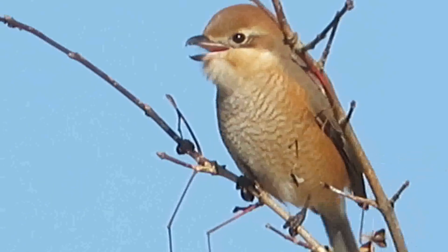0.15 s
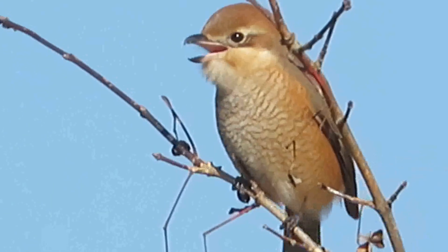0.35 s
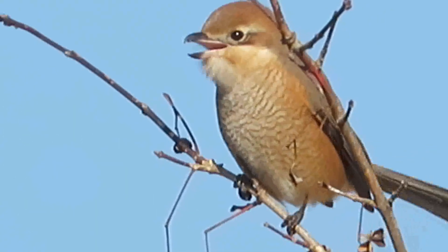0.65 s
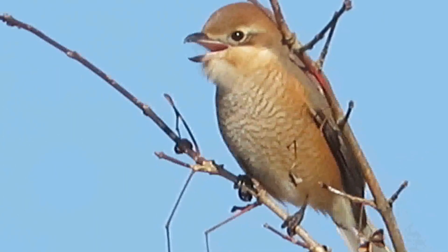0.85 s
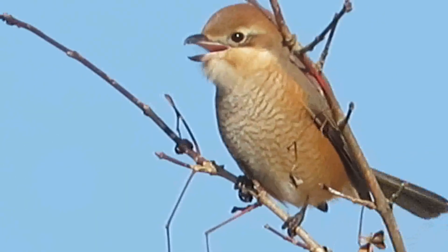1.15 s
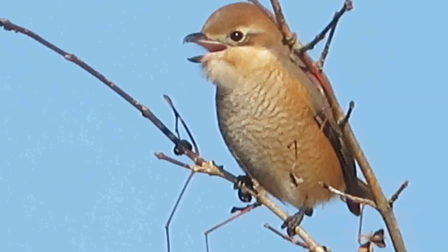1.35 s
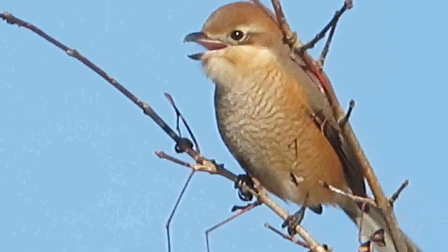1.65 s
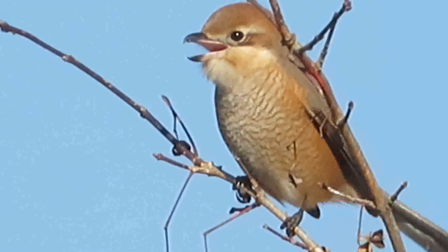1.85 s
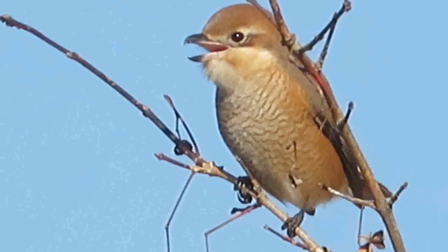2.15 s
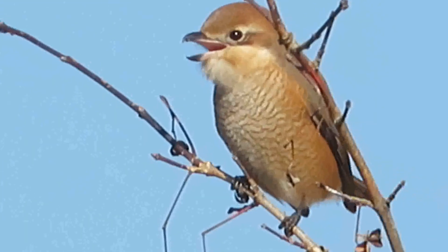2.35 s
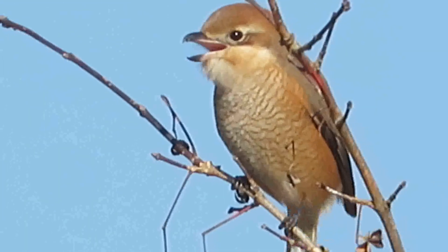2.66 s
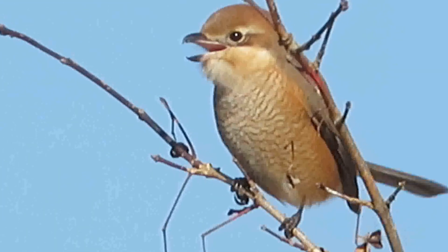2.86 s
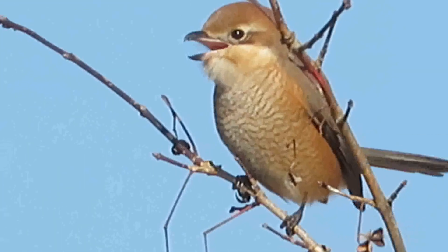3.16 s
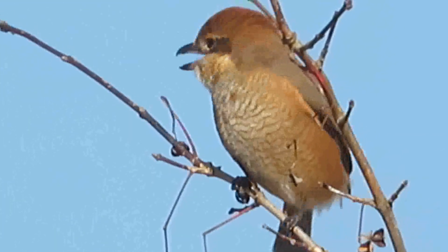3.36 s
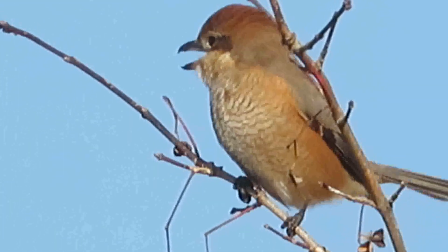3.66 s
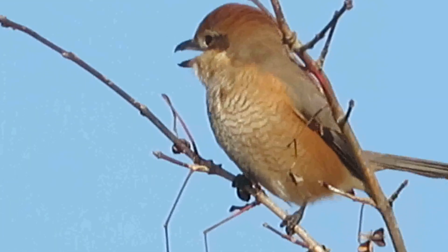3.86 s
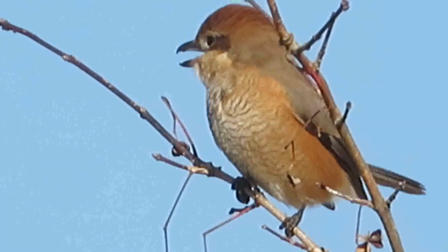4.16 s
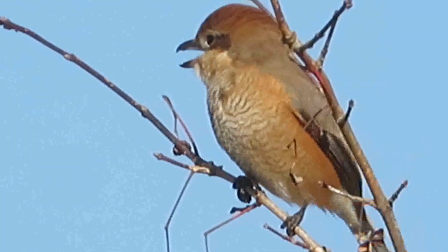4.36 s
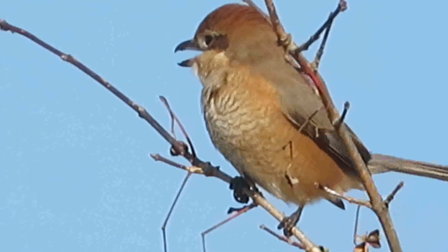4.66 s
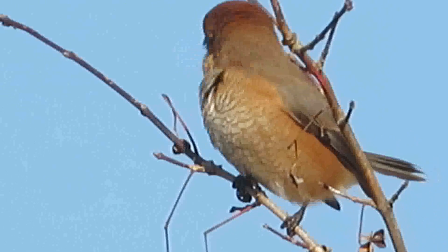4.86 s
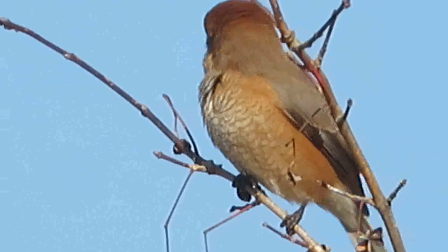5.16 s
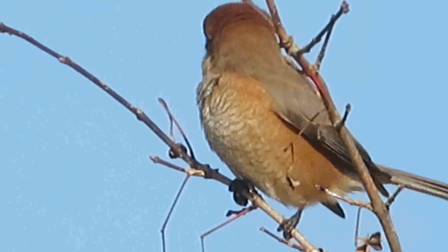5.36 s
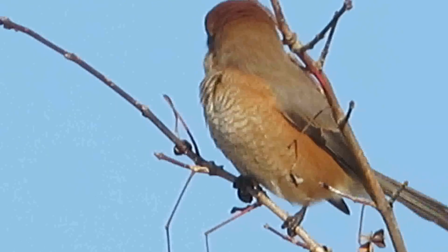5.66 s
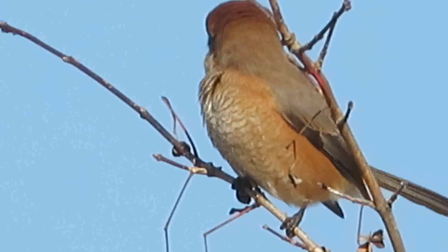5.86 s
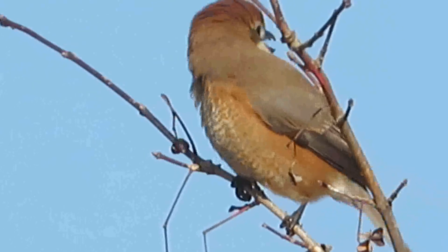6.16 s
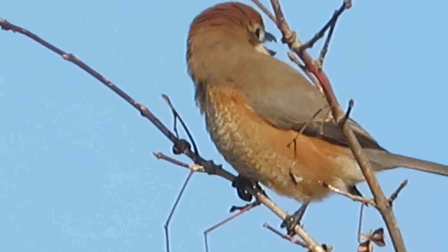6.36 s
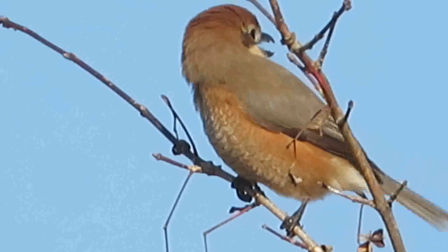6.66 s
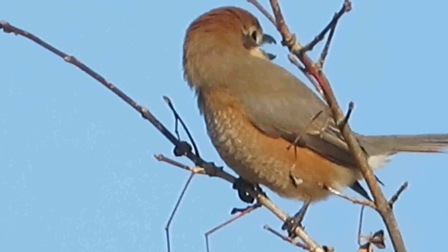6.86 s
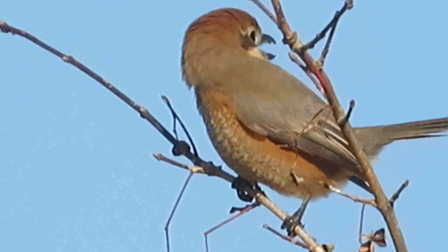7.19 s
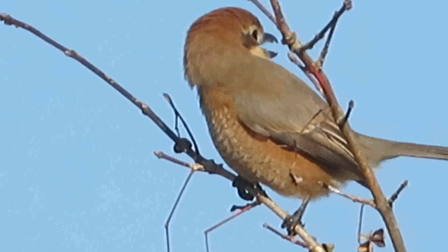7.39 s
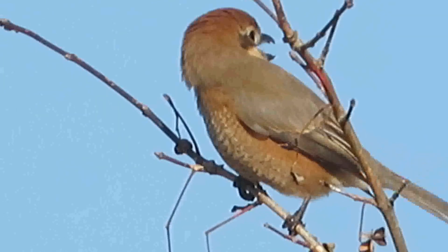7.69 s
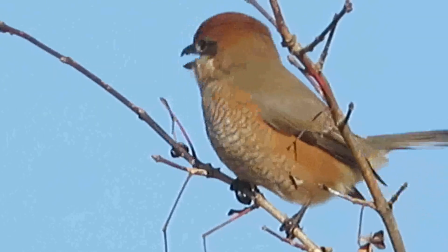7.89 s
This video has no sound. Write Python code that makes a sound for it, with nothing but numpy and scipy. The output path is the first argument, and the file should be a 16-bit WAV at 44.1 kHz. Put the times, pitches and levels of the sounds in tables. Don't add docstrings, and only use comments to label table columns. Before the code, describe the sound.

A shrike on a bare twig rattles harsh, fast chattering notes without pause, dulling as its head turns, over low wind buffeting and faint town hum.

```python
import sys
import numpy as np
from scipy import signal
from scipy.fft import rfft, irfft, next_fast_len
from scipy.io import wavfile
from scipy.ndimage import uniform_filter1d

SR = 44100
rng = np.random.default_rng(int(sys.argv[2]) if len(sys.argv) > 2 else 0)


def to_linear_factor(level_db):
    exponent = np.asarray(level_db, float) / 20
    return 10 ** exponent


def persist_wave(psi):
    counts = np.round(np.clip(psi, -1, 1) * 32767).astype(np.int16)
    wavfile.write(sys.argv[1], SR, np.atleast_2d(counts).T)


N = 354123

# (frequency [Hz], level [dB per Hz])
HUM_MIDDLE = [(25, -29.5), (80, -12), (200, -13), (270, -13.5), (450, -12.5), (560, -17.5), (900, -20),
              (1150, -26), (1800, -30), (3500, -33), (6200, -38.5), (9000, -44), (12000, -48.5),
              (15500, -56)]
# (frequency [Hz], level [dB per Hz])
HUM_SIDE = [(25, -35), (80, -51), (160, -23.5), (450, -17), (560, -24), (900, -25.5), (2000, -32),
            (4000, -40), (9000, -48.5), (12000, -54), (15500, -61)]
# (time [s], level [dB])
GUSTS = [(0, -53.5), (.83, -51.5), (1.54, -49), (1.74, -52), (2.1, -47.5), (2.28, -55.5), (2.75, -52),
         (3.06, -54), (3.58, -52.5), (4.72, -53.5), (4.83, -52.5), (5.81, -53), (6.06, -48), (6.33, -59),
         (6.46, -49.5), (6.82, -51), (7.05, -48), (7.38, -51.5)]
# (frequency [Hz], level [dB])
RUMBLE_COLOUR = [(15, -23), (30, -4.5), (55, 1.5), (85, 1.5), (120, -11), (250, -34), (1000, -130)]
# (frequency [Hz], level [dB])
FLUTTER_COLOUR = [(50, -25), (100, -8.5), (125, 3.5), (200, -6.0), (320, -17.0), (600, -48), (2000, -130)]
# (time [s], peak level [dB], frequency [Hz])
THUMPS = [(.155, -30, 144), (0.381, -33.5, 124), (1.191, -32, 108), (1.405, -32.5, 82), (1.599, -28, 128),
          (1.637, -30, 107), (1.756, -32.5, 71.6), (1.916, -34, 115), (1.933, -30, 80), (1.952, -28, 113),
          (1.984, -34.5, 114), (2.166, -37, 109), (2.2, -32.5, 86.5), (5.257, -36, 95.5), (5.303, -32, 86),
          (5.387, -31, 80.5), (5.728, -33, 119), (5.757, -36, 80.5), (6.348, -39, 87), (6.369, -32, 84),
          (6.392, -34.5, 95.5), (6.411, -29, 90), (6.433, -34, 107), (6.492, -32, 85.5), (6.614, -37, 100),
          (6.899, -33.5, 114), (6.936, -31.5, 122), (6.979, -31.5, 127), (7.096, -34, 90), (7.118, -32, 95)]
# (frequency [Hz], level [dB])
FEATHER_COLOUR = [(1200, -30), (2200, 0), (4200, 0), (6000, -27)]
# (time [s], frequency [Hz], rms level [dB])
WHISTLES = [
    [(2.52, 5900, -78), (2.535, 6100, -76), (2.555, 6160, -72), (2.57, 6900, -74)],
    [(3.515, 6300, -78), (3.525, 6480, -70), (3.54, 6500, -68), (3.55, 6750, -74)],
    [(5.655, 6800, -82), (5.67, 6400, -71), (5.688, 6100, -70), (5.70, 6400, -70), (5.713, 6850, -77),
     (5.722, 6600, -72), (5.73, 5900, -80)],
    [(7.247, 6840, -78), (7.258, 6350, -59), (7.27, 6330, -63), (7.288, 6200, -60), (7.30, 6730, -64),
     (7.31, 6000, -61), (7.317, 4900, -74)],
    [(7.373, 6150, -74), (7.386, 5750, -68), (7.40, 6200, -59.5), (7.412, 6500, -59), (7.428, 6900, -70),
     (7.435, 6800, -68), (7.443, 5200, -68)],
]
# (frequency [Hz], level [dB])
ECHO_COLOUR = [(1000, 8.0), (5000, 4.0), (9000, 8.5), (15000, -10)]

# (time [s], level [dB])
FACING_NOTES = [(0.023, -46), (.1012, -47.5), (.1768, -46), (0.2595, -46.5), (0.3432, -46), (0.4245, -45.5),
                (0.5122, -46.5), (0.593, -47), (0.6758, -47.5), (0.7518, -49), (0.8357, -51), (0.919, -47.5),
                (1.0051, -46.5), (1.0884, -47.5), (1.166, -46.5), (1.2454, -47.5), (1.3268, -46.5), (1.41, -47),
                (1.493, -46), (1.5796, -45.5), (1.6617, -45.5), (1.7403, -46.5),
                (1.822, -48.5), (1.9034, -47), (1.9868, -48), (2.0719, -47.5), (2.1544, -47), (2.24, -48),
          (2.321, -47), (2.405, -46), (2.492, -45.5), (2.5713, -46.5), (2.653, -46.5), (2.7328, -46.5),
          (2.8176, -45.5), (2.9015, -45.5), (2.9814, -47), (3.0611, -49), (3.1457, -47.5), (3.2228, -48),
          (3.3087, -47.5), (3.3949, -48.5), (3.4758, -46.5)]
SIDEWAYS = [(3.552, -52), (3.6318, -55.5), (3.7152, -56.5), (3.7967, -57), (3.8758, -55.5), (3.9622, -54),
            (4.0505, -53.5), (4.1487, -55), (4.2536, -54.5), (4.3327, -54.5), (4.421, -53.5), (4.5054, -56),
            (4.5961, -53), (4.683, -55.5), (4.774, -55.5), (4.863, -54), (4.949, -53), (5.0382, -54.5),
            (5.1147, -55.5), (5.2003, -54), (5.2906, -51)]
AWAY = [
    (5.4647, -52),
    (5.5556, -49.5),
    (5.6409, -50),
    (5.725, -49.5),
    (5.812, -50.5),
    (5.892, -51.5),
    (5.976, -50.5),
    (6.0613, -53),
    (6.1473, -50.5),
    (6.235, -51),
]
OVER_SHOULDER = [(6.309, -54.5), (6.3964, -53), (6.483, -53), (6.5727, -53.5), (6.6608, -53.5),
                 (6.7418, -52.5), (6.8218, -52), (6.9057, -53), (6.988, -52.5), (7.0743, -54), (7.156, -56),
                 (7.242, -54.5), (7.3243, -53.5), (7.4065, -54), (7.487, -56), (7.5742, -55), (7.6569, -57),
                 (7.7402, -56.5), (7.831, -55), (7.912, -55.5), (7.9903, -54)]
# (time [s], level of a usual note [dB], pulse rate [Hz], level of the top [dB])
HEAD = [(0, -48, 1450, -19), (1.0, -47.5, 1447, -19), (1.75, -47, 1435, -16.5), (2.3, -47.5, 1440, -18.5),
        (3.49, -47, 1434, -18.5), (3.56, -54, 1430, -14), (4.1, -55.5, 1433, -21), (5.1, -55, 1425, -19),
        (5.3, -53.5, 1417, -28), (5.45, -54.5, 1437, -48), (5.75, -51.5, 1441, -31),
        (6.2, -52.5, 1405, -29), (6.6, -54, 1434, -30), (7.0, -53, 1456, -29), (7.4, -55.5, 1483, -21),
        (8.03, -54, 1463, -27)]
# (start [ms], length [ms], level [dB], rate factor at start [ratio], rate factor at end [ratio])
BURSTS = [
    (.3, 5, 3, 1.04, 0.98),
    (9.6, 4.8, 3, 1.03, 0.96),
    (16, 8.3, -8, 1.0, .95),
]
# (start [ms], length [ms], level [dB])
SLIPS = [
    (.6, 0.39, -15.5),
    (5.2, 3.54, -3.5),
    (14.5, 3.1, -4),
    (18.63, 2.65, -5.5),
    (24, .8, -9.5),
]
# (time [ms], rate factor [ratio], level [dB])
CLOSING = [
    (17.1, .93, -35),
    (18.9, .91, -8.5),
    (22, .895, -7),
    (23.85, .88, -10.5),
    (25.8, 0.88, -13),
    (29, 0.84, -36),
]
# (frequency [Hz], level [dB])
THROAT = [(1440, -12), (2100, -10.5), (2850, -8), (3600, -22), (4150, -1.5), (4550, 0), (5050, 1),
          (5730, -6.5), (7100, -24.5), (8400, -28.5), (10000, -32.5), (11400, -27.5), (13000, -37.5),
          (15500, -46)]
# (frequency [Hz], level [dB])
BREATH_COLOUR = [(1200, -62), (2700, -1.5), (4000, 4.5), (5500, -19.0), (6500, -47), (8500, -38),
                 (10500, -19.5), (13000, -36), (16000, -60)]
AIM_HZ = [1500, 3580, 4400, 4660, 6260, 7340]
CLOSING_BEAK_DB = np.array([2.5, -14, -7.5, 7, -5, -2])

# (frequency [Hz], level [dB])
STARVED_COLOUR = [(1900, -40), (2700, 0), (3700, 0), (4200, -14), (5400, -14), (6000, 0)]
# (frequency [Hz], level [dB])
RING_COLOUR = [(3000, -40), (4000, -1.5), (6000, -21), (7000, -40)]


def colour(x, points):
    size = next_fast_len(x.shape[-1])
    hz, db = np.transpose(points)
    grid = np.maximum(np.arange(size // 2 + 1) * SR / size, 1)
    gain = to_linear_factor(np.interp(np.log(grid), np.log(hz), db))
    return irfft(rfft(x, size) * gain, size)[..., :x.shape[-1]]


def unit(x):
    return x / np.sqrt(np.mean(x ** 2))


def walk(rate, shape=(N,)):
    k = max(int(SR / rate), 1)
    once = uniform_filter1d(rng.standard_normal(shape), k)
    return unit(uniform_filter1d(once, k))


def town():
    noise = rng.standard_normal((2, N))
    mid = colour(noise[0], HUM_MIDDLE)
    side = colour(noise[1], HUM_SIDE)
    scale = to_linear_factor(-53.5 + 0.38 * walk(0.64)) / np.sqrt(np.mean(mid ** 2))
    return scale * np.array([0.84 * (mid + side), 0.9 * (mid - side)])


def wind():
    rumble_db = np.interp(np.arange(N) / SR, *np.transpose(GUSTS))
    flutter_db = -57.5 + 1.46 * (rumble_db + 53)
    throb = 1.24 * walk(19.0)
    noise = rng.standard_normal((4, N))
    sides = np.array([[1], [-1]])
    rumble = unit(colour(noise[0], RUMBLE_COLOUR))
    rumble = rumble + 0.042 * sides * unit(colour(noise[1], FLUTTER_COLOUR))
    flutter = unit(colour(noise[2], FLUTTER_COLOUR))
    flutter = flutter + .5 * sides * unit(colour(noise[3], FLUTTER_COLOUR))
    return to_linear_factor(rumble_db + throb + 1.5) * rumble + to_linear_factor(flutter_db + throb - 1.0) * flutter


def eddies():
    s, db, _ = np.transpose(THUMPS)
    chance = rng.standard_normal((len(s), 3)).T
    shed_s = np.clip(s + 0.05 * chance[0], .05, 7.9)
    shed_db = db - 4 + 2 * chance[1]
    shed_hz = 98 * (1 + 0.22 * chance[2])
    return np.vstack([THUMPS, np.transpose([shed_s, shed_db, shed_hz])])


def thumps():
    out, rows = np.zeros((2, N)), eddies()
    turn = 2 * np.pi * rng.random((len(rows), 1))
    half = 1500
    t = np.arange(-half, half) / SR
    port_db = np.array([[-1.9], [1.7]])
    for (s, db, hz), phase in zip(rows, turn):
        bump = np.exp(-(t * hz / 0.59) ** 2)
        i = int(s * SR) + np.arange(-half, half)
        skew = np.array([[1], [-1]]) * 0.49 * hz / 110
        push = bump * np.cos(2 * np.pi * hz * t + phase + skew)
        edge = np.cos(2 * np.pi * 2.17 * hz * t + 2 * skew + 2 * phase)
        snap = 0.31 * to_linear_factor(db + 32.0) * bump ** 2 * edge
        out[:, i] += to_linear_factor(db + 0.2 + port_db) * (push + snap)
    return out


def rustle():
    t = np.arange(N) / SR
    shake = np.exp(-((t - 4.925) / 0.017) ** 2) * to_linear_factor(2.4 * walk(300))
    return to_linear_factor(-62.0) * shake * unit(colour(rng.standard_normal(N), FEATHER_COLOUR))


def whistler():
    out = np.zeros(N)
    for call in WHISTLES:
        s, hz, db = np.transpose(call)
        i = np.arange(int(s[0] * SR), int(s[-1] * SR))
        fade = np.minimum(1, np.minimum(i - i[0], i[-1] - i) / 90)
        level = to_linear_factor(np.interp(i / SR, s, db))
        phase = 2 * np.pi * np.cumsum(np.interp(i / SR, s, hz)) / SR
        out[i] = np.sqrt(2) * fade * level * np.sin(phase)
    return out * to_linear_factor(1.5 * walk(120))


def hedges(x):
    t = np.arange(int(.7 * SR)) / SR
    near, far = (-16.0, .045), (-19, 0.86)
    tail = 0
    for db, t60 in (near, far):
        decay = np.exp(-np.log(1000) * t / t60) * np.minimum(t / 0.0021, 1)
        scatter = rng.standard_normal((3, len(t)))
        tail = tail + to_linear_factor(db) * decay / np.sqrt(np.sum(decay ** 2)) * scatter
    ports = .62 * tail[0] + .78 * tail[1:]
    return signal.fftconvolve(x[None], colour(ports, ECHO_COLOUR), axes=1)[:, :N]


def swells(ms, rows, rise, fall, arch):
    start, length, db = np.transpose(rows)[:3, :, None]
    inside = np.clip(2 * (ms - start) / length - 1, -1, 1)
    before = np.maximum(start - ms, 0)
    after = np.maximum(ms - start - length, 0)
    return np.max(db - arch * inside ** 2 - rise * before - fall * after, axis=0)


def membrane(hz, orders, tint_db, bright_db):
    phase = 2 * np.pi * np.cumsum(hz) / SR
    f = np.outer(orders, hz)
    throat_hz, throat_db = np.transpose(THROAT)
    tint = np.interp(f, AIM_HZ, tint_db) + bright_db * np.clip(f / 3000 - 2, 0, 1)
    gain = to_linear_factor(np.interp(np.log(f), np.log(throat_hz), throat_db) + tint)
    lag = 2 * np.pi * rng.random((len(orders), 1))
    return np.sqrt(2) * np.sum(gain * np.sin(np.outer(orders, phase) + lag), axis=0)


def shrike():
    span = int(.032 * SR)
    out = np.zeros((2, N + span))
    onset, level = np.transpose(FACING_NOTES + SIDEWAYS + AWAY + OVER_SHOULDER)
    head_s = np.array(HEAD)[:, 0]
    usual, pulse, top = (np.interp(onset, head_s, c) for c in np.transpose(HEAD)[1:])
    push, count = level - usual, len(onset)
    chance = rng.standard_normal((count, 3)).T
    pulse = pulse + 6 * push + 10.7 * chance[0]
    top = top - 0.2 * push
    closing = -7 - 2 * push + 2.2 * chance[1]
    tempo = 1 + 0.024 * chance[2]
    wobble = 1 + .012 * walk(600, shape=(count, 2, span))
    swell = to_linear_factor(0.83 * walk(350, shape=(count, 3, span)))
    rasp = 1 + to_linear_factor(-15) * walk(5000, shape=(count, span))
    air = unit(colour(rng.standard_normal((count, span)), BREATH_COLOUR))
    knots = [knot for s, n, _, a, b in BURSTS for knot in ((s, a), (s + n, b))]
    ms, rate = np.transpose(knots)
    end_ms, end_rate, end_db = np.transpose(CLOSING)
    whole = np.arange(1, 11)
    for k, (s, db, hz, top_db, closing_db) in enumerate(zip(onset, level, pulse, top, closing)):
        t = 1000 * np.arange(span) / SR / tempo[k]
        round_head = -.45 * (db + 51.5)
        tint = [1.04 * round_head + 1.0, round_head, 0, 0, 0.85 * (top_db + 18.0), top_db + 20.0]
        bright = 3.5 - ((t - 13.5) / 5.5) ** 2
        main = hz * np.interp(t, ms, rate) * wobble[k, 0]
        even = to_linear_factor(swells(t, BURSTS, rise=7, fall=11.5, arch=3))
        odd = to_linear_factor(swells(t, SLIPS, rise=8.5, fall=9, arch=0) + 0.28 * (closing_db + 3.5))
        note = even * swell[k, 0] * membrane(main, whole, tint, bright)
        note += odd * swell[k, 1] * membrane(main, whole + .5, tint, bright)
        slow = hz * np.interp(t, end_ms, end_rate) * wobble[k, 1]
        end = to_linear_factor(np.interp(t, end_ms, end_db + closing_db + 6.5, left=-90, right=-90))
        note += end * swell[k, 2] * membrane(slow, whole, tint + CLOSING_BEAK_DB, bright)
        note += to_linear_factor(-11.5 + 0.62 * round_head) * (0.19 * even + 3.55 * odd) * air[k]
        snap_open = np.clip((t - 0.77) / .25 + 1, 0, 1)
        both_db = db + np.array([[0], [1.8 * round_head]])
        at = int((s - .0007) * SR)
        out[:, at:at + span] += to_linear_factor(both_db) * note * rasp[k] * snap_open
    return out[:, :N]


def scene():
    (aimed, spread), far = shrike(), whistler()
    return aimed + far + hedges(spread + far) + wind() + thumps() + town() + rustle()


def low_pass(x):
    return signal.sosfilt(signal.butter(12, 15640, fs=SR, output="sos"), x)


def record(dry):
    mid, side = (dry[0] + dry[1]) / 2, (dry[0] - dry[1]) / 2
    loud = uniform_filter1d(colour(mid, RING_COLOUR) ** 2, size=450)
    starve = np.clip((10 * np.log10(loud + 1e-12) + 58) / 6, 0, 1)
    side = side - starve * colour(side, STARVED_COLOUR)
    ahead = np.clip(np.roll(starve, -480) - 2 * starve, 0, 1)
    mid = mid - ahead * colour(mid, [(11000, -36), (13000, 2)])
    top_hz = 15550
    ports = colour(np.array([mid + side, mid - side]), [(top_hz - 100, 0), (top_hz + 100, -70)])
    return low_pass(ports)


dry = scene()
out = record(dry)
persist_wave(out)
```